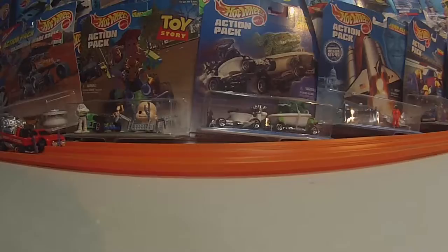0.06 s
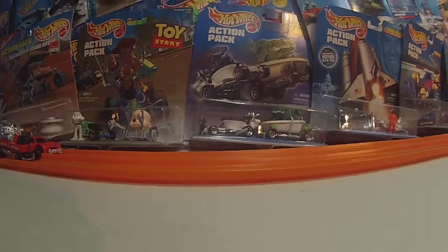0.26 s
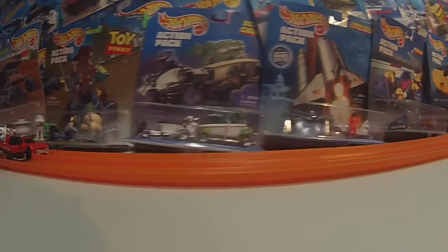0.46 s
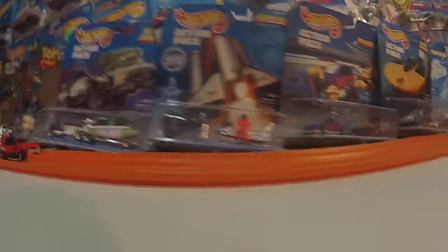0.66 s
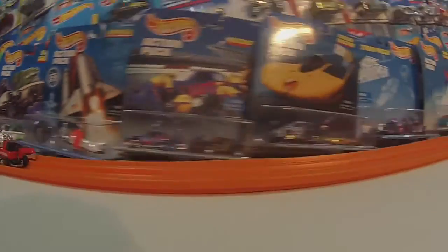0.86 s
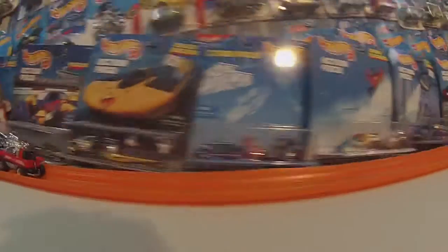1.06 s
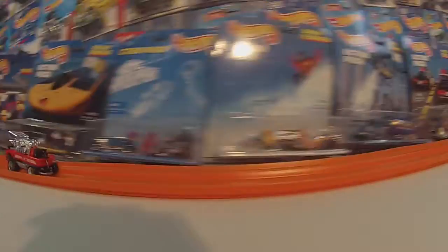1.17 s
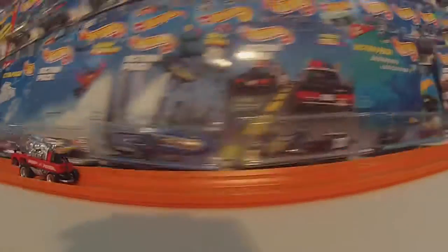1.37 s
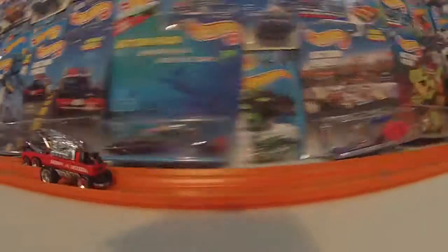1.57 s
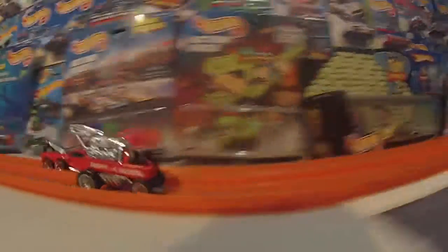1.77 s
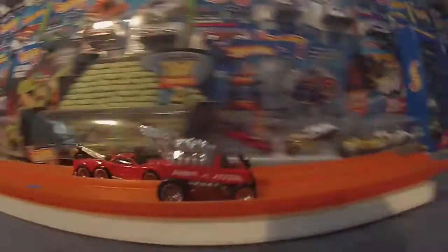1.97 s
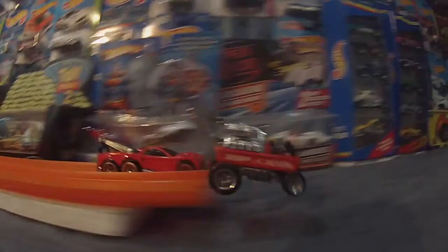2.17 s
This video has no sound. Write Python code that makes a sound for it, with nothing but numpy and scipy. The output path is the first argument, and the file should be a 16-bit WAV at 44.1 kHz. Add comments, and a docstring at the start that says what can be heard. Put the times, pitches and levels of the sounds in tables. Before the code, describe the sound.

Small hard-wheeled toy cars roll along a plastic track, speeding up into a loud clattering rattle

```python
"""Toy cart on a plastic track

A small camera rides a wheeled cart beside toy cars on a plastic track, indoors. A scuff is heard as things start
rolling: random grit impacts, filtered by the plastic's resonances, hiss and rattle, slackening at each track joint.
Noise bursts with a sharp snap make the knocks; turn-locked swings and noise make the rumble; single swings make
the jolts. A narrow noise band and wheel tones drone in the hollow track, over faint room noise. The end is cut off."""
import sys
import numpy as np
from scipy import signal
from scipy.fft import rfft, irfft
from scipy.io import wavfile
from scipy.ndimage import uniform_filter1d

SR = 44100
rng = np.random.default_rng(int(sys.argv[2]) if len(sys.argv) > 2 else 0)


def bounce(signal):
    """Save signal as a 16-bit WAV file at the path given by the first command-line argument."""
    frames = np.transpose(np.atleast_2d(signal))
    limited = np.clip(frames, -1, 1)
    pcm = np.round(limited * 32767).astype(np.int16)
    wavfile.write(sys.argv[1], SR, pcm)


N = 98034

# response of the plastic in the low-middle: (frequency [Hz], level [dB])
PLASTIC_BODY = [(300, -18.5), (500, -6.5), (1080, -10.5), (1330, -3), (2000, -1), (2500, -5.5), (3300, -21)]
# bright resonance of the plastic: (frequency [Hz], level [dB])
PLASTIC_BRIGHT = [(2000, -13), (2700, -2.5), (3380, 2), (3950, -1), (4400, -8.5), (4900, -18),
                  (6000, -18.5)]
# treble response to ticks of axles and metal: (frequency [Hz], level [dB])
METAL_TICK = [(2820, -29.5), (4800, 1.5), (6800, 4), (8030, 4), (9630, -5), (12000, -4.5), (13000, -11),
              (14100, -3.5), (15500, -17.5)]


def undb(db):
    """Amplitude ratio of a level in dB, by the definition of the decibel."""
    return 10 ** (np.asarray(db) / 20)


def unit(x):
    """Normalisation to a root-mean-square of 1."""
    return x / np.sqrt(np.mean(x ** 2))


def curve(table, column):
    """Linear interpolation of one column of a time table at every sample."""
    table = np.array(table, float)
    return np.interp(np.arange(N) / SR, table[:, 0], table[:, column])


def colour(x, points):
    """Minimum-phase filtering: the folded cepstrum of (Hz, dB) points gives a causal response of energy 1."""
    size = 8192
    points = np.array(points, float)
    hz = np.maximum(np.arange(size // 2 + 1) * SR / size, 1)
    level_db = np.interp(np.log(hz), np.log(points[:, 0]), points[:, 1], left=-70, right=-70)
    cepstrum = irfft(level_db * np.log(10) / 20)
    # fold the negative times onto the positive ones
    cepstrum[1:size // 2] *= 2
    cepstrum[size // 2 + 1:] = 0
    response = irfft(np.exp(rfft(cepstrum)))
    return signal.fftconvolve(x, response / np.sqrt(np.sum(response ** 2)))[:N]


def walk(rate):
    """Slow random modulation: levels held for 1 / rate s, smoothed by two moving averages, RMS 1."""
    hold = int(SR / rate)
    steps = np.repeat(rng.standard_normal(N)[:N // hold + 1], hold)[:N]
    return unit(uniform_filter1d(uniform_filter1d(steps, hold), hold))


def grains(rate, spread_db):
    """Shot noise: tiny impacts of uneven size at random instants, rate per second on average."""
    hit, size, sign = rng.random(N), rng.exponential(size=N), rng.standard_normal(N)
    return (hit < rate / SR) * undb(spread_db * np.minimum(size, 4)) * sign


def wheel_turns():
    """Rotation angle in turns: the time integral of the slightly unsteady wheel rate."""
    # wheel speed: (time [s], nominal rate [turns/s])
    speed = [(.45, 16.26), (.8, 27.6), (1.0, 33.9), (1.3, 42.5), (1.65, 47.3), (1.85, 48), (2.12, 43.4)]
    first_turn = .3
    return first_turn + np.cumsum(curve(speed, 1) * (1 + 0.0041 * walk(15))) / SR


def room_noise():
    """Stationary background: Gaussian noise with the room's spectrum."""
    # (frequency [Hz], level [dB])
    spectrum = [(15, -38.5), (25, 8.5), (75, -10.5), (109, -2.5), (176, -37), (224, -22), (286, -25),
                (501, -25.5), (3350, -45), (15000, -55)]
    return unit(colour(rng.standard_normal(N), spectrum)) * undb(-47)


def rumble(turn):
    """Forced vibration: the cart shakes the camera with a wobble and bump each turn, rough rumble and shell drone."""
    # (time [s], deep rumble [dB], middle rumble [dB], shell drone [dB])
    levels = [(.17, -55, -57, -78), (.23, -35, -34, -33.5), (.31, -42, -26, -32), (.37, -26, -24, -25.5),
              (.45, -27, -12, -19.5), (.6, -29.5, -18.5, -22.5), (.72, -12.5, -23.5, -14.5),
              (.82, -36, -22.5, -24), (.95, -22, -27, -23), (1.1, -31, -31, -24.5), (1.24, -28.5, -23, -25),
              (1.33, -31, -26.5, -30), (1.4, -24, -30, -22), (1.59, -21, -18, -29), (1.67, -22.5, -29, -25),
              (1.73, -15.5, -22, -23.5), (1.9, -31, -26, -29), (2.12, -31.5, -28.5, -34)]
    # (frequency [Hz], level [dB])
    middle_response = [(40, -0.5), (75, -1), (130, 0), (200, -5), (260, -11.5)]
    # (frequency [Hz], level [dB])
    shell_response = [(110, -35.5), (190, -1.5), (237, -4), (270, 2), (367, -1), (495, -14.5), (900, -41),
                      (1170, -27)]
    wobble_share, bump_share = 0.98, 0.95  # amplitudes beside noise of RMS 1
    flicker_db, bump_scatter_db = 1.5, 3

    deep_noise = colour(rng.standard_normal(N), [(26, -29.5), (38, -9), (60, -13), (90, -12)])
    deep = wobble_share * np.sin(2 * np.pi * turn) + unit(deep_noise)
    rough = undb(flicker_db * walk(59.7))
    middle = colour(rng.standard_normal(N) * rough, middle_response)
    # an uneven wheel bumps once a turn
    new_turn = np.diff(np.floor(turn), prepend=0).clip(0)
    bumps = -unit(new_turn * undb(bump_scatter_db * walk(40.26)))
    shell = colour(unit(grains(2500, 2.3) * rough) + bump_share * bumps, shell_response)
    return sum(unit(x) * undb(curve(levels, k + 1)) for k, x in enumerate((deep, middle, shell)))


def knocks():
    """Impact excitation: a snap in a short contact burst rings plastic and metal; the blow thuds in the track."""
    # knocks of wheels and axles:
    # (time [s], level [dB], treble relative to it [dB], hollow thud relative to it [dB])
    impacts = [(0.211, -53, 2, -9), (0.221, -40, -23, -10), (0.3353, -32, -28, -8),
               (0.3653, -22.5, -23, -29), (0.395, -49, 15, -18), (0.401, -10.5, -29.5, -40),
               (0.4454, -15, -34, -44.5), (0.4772, -17, -9.5, -35), (0.4916, -7, -22, -36),
               (0.5579, -6, -23, -19), (0.6115, -6, -20.5, -24), (0.6381, -29, 9, -7),
               (0.7023, -27, 9, -25), (0.712, -23, -7, 0), (0.728, -25, 2, -20.5), (0.7506, -7, -22, -34),
               (0.7911, -13, -16.5, -27), (0.829, -8, -20, -26), (0.8634, -7.5, -10.5, -5.5),
               (0.8969, -0.5, -21.5, -21), (0.9276, -3.5, -7.5, -21), (0.9492, -31, 9.5, 4),
               (0.9653, -20.5, 1.5, 5.5), (0.991, -9.5, -16, -32), (1.0505, -10, -15.5, -21),
               (1.073, -16, -16, -25), (1.0785, -10, -16, -12), (1.1054, -9, -22.5, -28),
               (1.1326, -6, -22.5, -36), (1.1812, -13.5, -8.5, -11), (1.208, -8.5, -15, -16),
               (1.2321, -12, -11.5, -30), (1.306, -20, -21, -27), (1.3984, -6, -11, -21.5),
               (1.4458, -8, -13, -15), (1.51, -5, -15.5, -14), (1.532, -25, -3, -15),
               (1.574, -3.5, -17, -24.5), (1.6191, -2.5, -21, -20.5), (1.6402, -10.5, -14, -9),
               (1.6606, -13, -21.5, -23), (1.6831, -10, -8.5, -14), (1.711, -16, -14.5, -20),
               (1.7469, -5.5, -17.5, -29), (1.769, -21.5, 0.5, -19.5), (1.7888, -3.5, -15.5, -21),
               (1.8219, 1, -18.5, -30), (1.8398, -7.5, -8, -14), (1.863, -19, -2, 1),
               (1.8941, -15, -4.5, -12), (1.94, -22, -10, 2.5), (2.051, -17, -15, -5.5),
               (2.1112, -9, -30.5, -19.5)]
    # response of the track to a blow: (frequency [Hz], level [dB])
    thud_response = [(250, -13.5), (600, 0.5), (1100, 1.5), (1700, -20)]
    rise_ms, fall_ms = .6, 1.66
    snap, thud_push = 1.57, 6.9  # strengths of the snap and of the downward blow

    lead = 200  # samples of the burst before the listed time
    ms = np.arange(-lead, 600) / SR * 1000
    rise = np.exp((ms - rise_ms) / rise_ms)
    fall = np.exp((rise_ms - ms) / fall_ms)
    shape = np.where(ms < rise_ms, rise, fall)
    peak = np.argmax(shape)
    plastic, metal, blow = np.zeros((3, N))
    noises = rng.standard_normal((len(impacts), len(ms)))
    for (s, db, treble_db, thud_db), noise in zip(impacts, noises):
        start = int(s * SR) - lead
        burst = unit(noise * shape) * np.sqrt(np.mean(shape ** 2))
        burst[peak] -= snap
        plastic[start:start + len(ms)] += burst * undb(db)
        metal[start:start + len(ms)] += burst * undb(db + treble_db)
        blow[start + peak] -= thud_push * undb(db + thud_db)
    ringing = 0.21 * colour(plastic, PLASTIC_BODY) + 0.43 * colour(plastic, PLASTIC_BRIGHT)
    return ringing + colour(metal, METAL_TICK) + colour(blow, thud_response)


def jolts():
    """Heavily damped transient: each jolt swings the camera body once, up and then down."""
    # (time [s], level [dB], swing frequency [Hz])
    swings = [(0.223, -18, 45), (0.334, -5.5, 69.8), (.394, -6.5, 126), (0.42, -5, 157), (.441, -2.5, 128),
              (.474, -2.5, 139), (0.665, -19, 59), (0.706, -2.5, 88), (0.861, -6, 138), (0.925, 1, 115),
              (0.9632, -0.5, 149), (1.386, -2.5, 59.72), (1.556, -21, 54.26), (1.712, -8, 64.4),
              (1.8387, 0, 123)]
    width_cycles = 0.27
    out, t = np.zeros(N), np.arange(3000) / SR
    for s, db, hz in swings:
        start = int(s * SR)
        envelope = np.exp(-((hz * t - .55) / width_cycles) ** 2)
        out[start:start + len(t)] += undb(db) * np.sin(2 * np.pi * hz * t) * envelope
    return out


def scuff():
    """Dry friction: a short scrape of dense grains under a bell-shaped envelope as things are set going."""
    # (frequency [Hz], level [dB])
    spectrum = [(350, -33), (600, -7), (1150, -1), (2010, 3), (4000, 0), (5500, 2.5), (15500, -22)]
    centre_s, rise_s, fall_s, level_db = 0.2566, 0.016, 0.015, -33.5
    t = np.arange(N) / SR - centre_s
    shape = np.exp(-(t / np.where(t < 0, rise_s, fall_s)) ** 2)
    scrape = grains(7100, 2.8) * undb(1.5 * walk(155.0))
    return unit(colour(scrape, spectrum)) * shape * undb(level_db)


def treble(shared_db):
    """Shot noise of axle and metal ticks; lower and upper treble flicker apart."""
    ticks_per_s, spread_db, flicker_db, split_hz = 3000, 3, 2.5, 9200

    def band(kind):
        """Band separation: flickering ticks on one side of the split frequency."""
        ticks = grains(ticks_per_s, spread_db) * undb(shared_db + flicker_db * walk(76))
        split = signal.butter(3, split_hz, kind, fs=SR, output="sos")
        return signal.sosfilt(split, colour(ticks, METAL_TICK))

    return unit(band("low") + band("high"))


def wheels(turn):
    """Rolling contact: grit under hard wheels rings the plastic, pulsing each turn and slackening at joints."""
    # (time [s], low-middle [dB], bright band [dB], treble [dB])
    levels = [(.17, -71.5, -75, -78), (.31, -53.5, -60, -58.5), (.38, -39.5, -42, -53.5),
              (.47, -31, -37, -47.5), (.61, -31, -26, -44), (.66, -32.5, -31, -39),
              (.8, -26.5, -24.5, -40.5), (.95, -31.5, -30, -40), (1.0, -34, -24.5, -37),
              (1.15, -31, -26.5, -40), (1.25, -26, -21.5, -32.5), (1.45, -24.5, -18.5, -31.5),
              (1.65, -23.5, -20, -33), (1.83, -23, -18.5, -31.5), (1.88, -27.5, -24.5, -35),
              (2.12, -29, -23.5, -38)]
    # joints of the track: (time [s], change of level [dB], length [s])
    joints = [(1.193, -4, 0.028), (1.358, -6.5, 0.031), (1.53, -5.5, 0.037), (1.696, -4, 0.06),
              (1.86, -5.5, .03), (2.015, -5, 0.025)]
    grains_per_s, spread_db = 4500, 2.5
    turn_depth_db, flicker_db, own_flicker_db = 2, 1, 1.5

    t = np.arange(N) / SR
    slack_db = sum(db * np.exp(-.5 * ((t - s) / (length / 2)) ** 2) for s, db, length in joints)
    shared_db = turn_depth_db * np.cos(2 * np.pi * turn) + flicker_db * walk(200)

    def band(response):
        """Resonance driven by grit: grains with a flicker of their own, through one response."""
        grit = grains(grains_per_s, spread_db) * undb(shared_db + own_flicker_db * walk(160))
        return unit(colour(grit, response))

    body = band(PLASTIC_BODY) * undb(curve(levels, 1) + slack_db)
    bright = band(PLASTIC_BRIGHT) * undb(curve(levels, 2) + slack_db)
    return body + bright + treble(shared_db) * undb(curve(levels, 3))


def hollow(turn):
    """Cavity resonance: the track drones in a narrow noise band, with harmonics of the uneven wheel's rotation."""
    # (time [s], frequency [Hz], level [dB])
    resonance = [(.3, 330, -79), (.46, 370, -31.5), (.72, 345, -29), (.9, 385, -27.5), (1.02, 320.2, -37),
                 (1.15, 335.6, -30.5), (1.3, 380.1, -27.5), (1.47, 375, -27.5), (1.65, 385, -30.5),
                 (1.8, 370, -37), (2.12, 365, -26.5)]
    # (multiple of the turning rate, level relative to the drone before its swell [dB])
    wheel_tones = [(8, -3), (9, -2.5)]
    width_hz, turn_swell_db = 39, 5
    steady = .8  # steady hum beside the noise in the band
    tones_from_s, tones_rise_s = 0.93, 0.063

    # slow noise on two quadrature carriers makes the narrow band
    k = int(SR / width_hz)
    a, b = (uniform_filter1d(uniform_filter1d(rng.standard_normal(N), k), k // 2) for _ in range(2))
    phase = 2 * np.pi * np.cumsum(curve(resonance, 1)) / SR
    drone = unit((steady + unit(a)) * np.cos(phase) + unit(b) * np.sin(phase))
    drone = drone * undb(turn_swell_db * np.cos(2 * np.pi * turn))
    tones = sum(undb(db + 2.5 * walk(8.99)) * np.sin(2 * np.pi * order * turn)
                for order, db in wheel_tones)
    fade_in = np.clip((np.arange(N) / SR - tones_from_s) / tones_rise_s, 0, 1)
    return (drone + np.sqrt(2) * tones * fade_in) * undb(curve(resonance, 2))


def scene():
    """Superposition: all sources add, with rumble, rattle and drone sharing one wheel rotation."""
    turn = wheel_turns()
    rolling = rumble(turn) + wheels(turn) + hollow(turn)
    return (room_noise() + rolling + knocks() + jolts() + scuff())[None]


def record(dry):
    """Saturation and band-limiting: the microphone rounds the peaks, the sound is cut, the top is trimmed."""
    cut_s, top_hz = 2.126, 15300
    rounded = np.tanh(1.15 * dry) / 1.076
    kept = rounded * (np.arange(N) < cut_s * SR)
    return signal.sosfilt(signal.ellip(8, .2, 70, top_hz, fs=SR, output="sos"), kept)


dry = scene()
out = record(dry)
bounce(out)
```